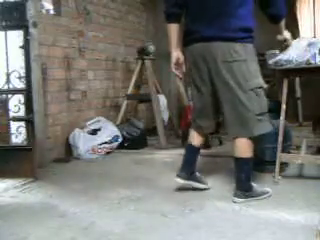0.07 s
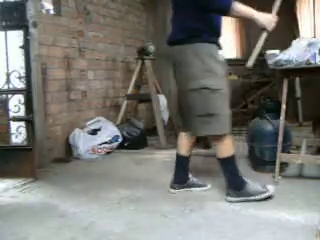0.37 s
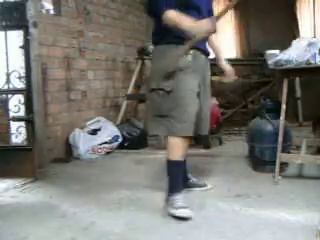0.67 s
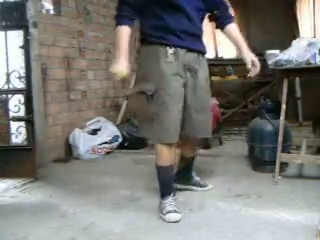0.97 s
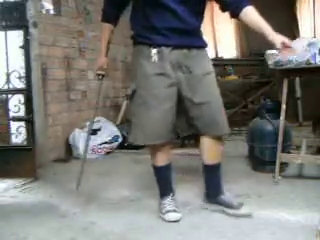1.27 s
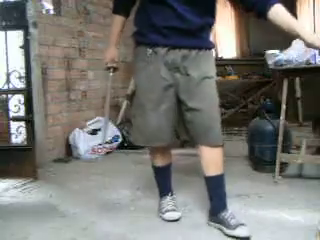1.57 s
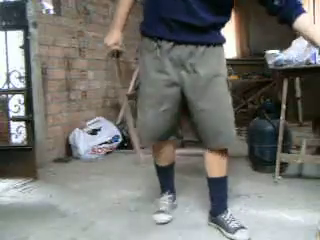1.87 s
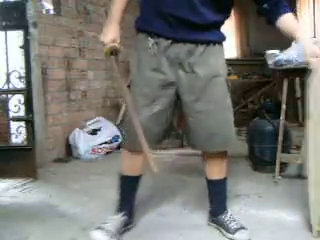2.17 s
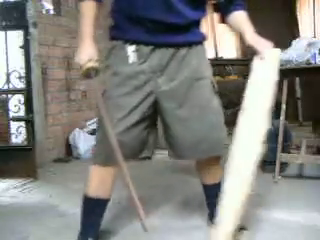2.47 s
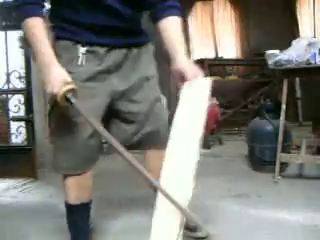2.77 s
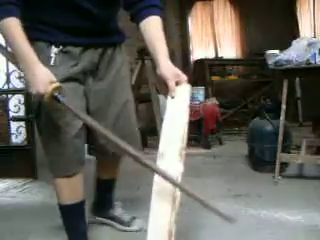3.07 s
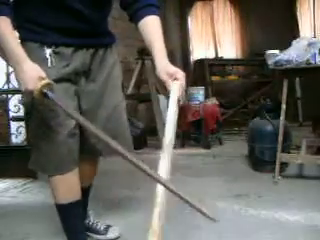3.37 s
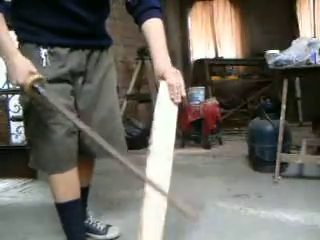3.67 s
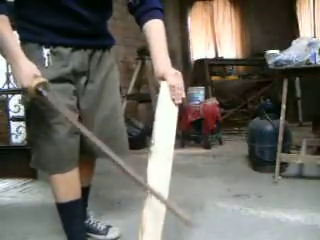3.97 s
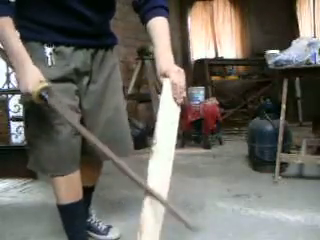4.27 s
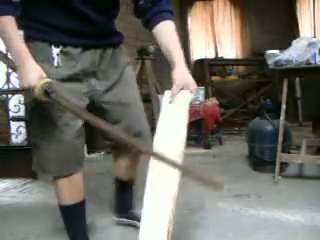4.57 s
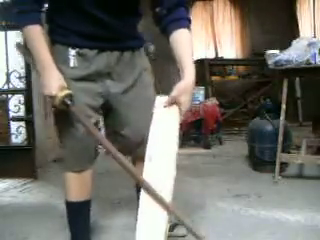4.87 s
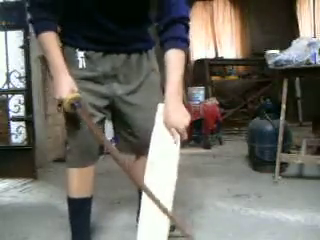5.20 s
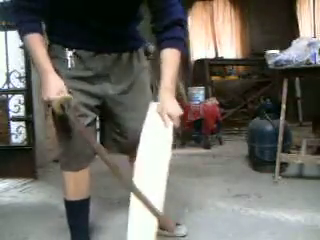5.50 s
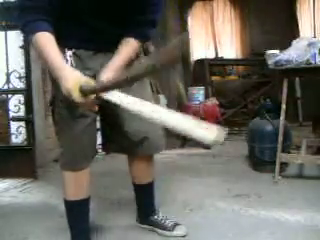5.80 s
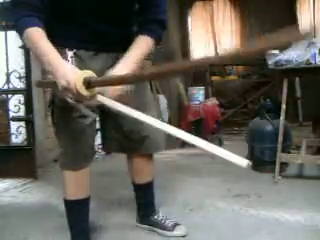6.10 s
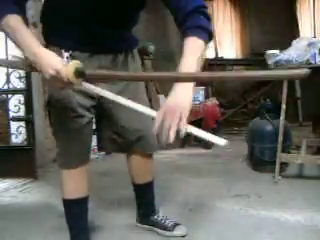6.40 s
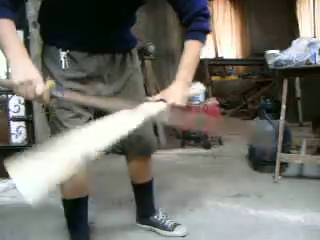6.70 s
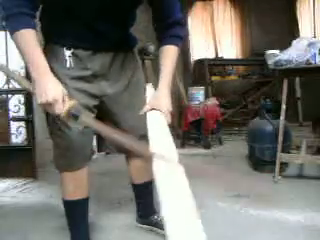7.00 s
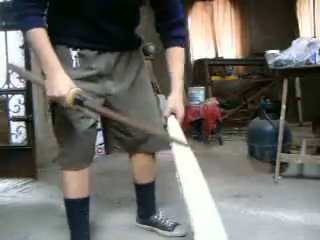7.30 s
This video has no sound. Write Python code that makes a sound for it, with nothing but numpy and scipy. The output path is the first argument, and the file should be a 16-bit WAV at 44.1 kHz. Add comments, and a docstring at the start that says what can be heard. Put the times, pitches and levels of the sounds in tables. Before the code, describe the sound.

In a bare brick workshop, shoes tap and scuff on concrete while clothes and hands rub over a faint hum and low rumble. From about three seconds a wooden sword knocks repeatedly on a hand-held board, each blow cracking, ringing briefly and often rebounding. Two softer knocks and a thin electrical tick follow, then more rubbing and one last blow. The small, close microphone sounds narrow and overloads on hard hits.

```python
"""A bare brick workshop, heard through a small narrow-band microphone near enough to overload.
At first shoes tap and scuff on concrete, and clothes and hands rub, over a faint hum and a low rumble.
From just before 3 s a wooden sword knocks on a hand-held board: both woods crack, ring, often rebound.
Each hard blow overloads the microphone, which turns its gain down after it. Around 6 s come two soft
knocks and a thin electrical tick, then more rubbing, and a last blow just after 7 s."""
import sys
import numpy as np
from scipy import signal
from scipy.fft import rfft, irfft
from scipy.io import wavfile
from scipy.ndimage import uniform_filter1d

SR = 44100
rng = np.random.default_rng(int(sys.argv[2]) if len(sys.argv) > 2 else 0)


def unload_audio(sound):
    """Save the sound as a 16-bit wav file, at the path given as the first command line argument."""
    columns = np.transpose(np.atleast_2d(sound))
    # keep every value between -1 and 1, then stretch to whole-number steps
    steps = np.round(np.clip(columns, -1, 1) * 32767)
    wavfile.write(sys.argv[1], SR, steps.astype(np.int16))


N = 328545

# Steady room tone. Each row: frequency in Hz, relative density in dB.
AIR_COLOUR = [(10, -14), (27, 5), (42, -12), (62, -3), (82, -5), (120, -12.5), (160, -7), (700, -10),
              (1000, -14.5), (1450, -22), (2500, -21), (3800, -29.5), (4300, -38)]
# Mains hum. Each row: frequency in Hz, level in dB.
MAINS_HUM = [(63, -40), (120, -45)]
# Swells of the deep rumble. Each row: time in seconds, relative level in dB.
RUMBLE_SWELLS = [(0.0, -31), (1.76, -29.5), (2.09, -38.5), (2.78, -25), (2.9, -29), (4.6, -44), (4.94, -32),
                 (5.21, -30.5), (5.37, -46.5), (5.64, -53), (5.89, -30), (6.68, -29.5), (7.45, -38)]
# Spectrum of the rumble. Each row: frequency in Hz, relative density in dB.
RUMBLE_COLOUR = [(10, -11.5), (26, 5), (42, -9), (62, 0), (85, -8.5), (118, -9), (160, -14), (300, -32),
                 (1000, -71.5)]
# Colour of the workshop's echo. Each row: frequency in Hz, gain in dB.
ROOM_COLOUR = [(60, -17.5), (250, -6), (600, 1.5), (1200, -1), (2600, 3), (4000, -4.5)]
# Decay of that echo. Each row: frequency in Hz, t60 in seconds.
ROOM_T60 = [(100, 0.93), (300, 0.47), (700, 0.56), (1500, 0.51), (2700, 0.43), (4200, 0.29)]

# Soles dragging. Each row: start in seconds, length in seconds, relative level in dB.
SCUFFS = [(1.69, 0.21, -30), (1.77, 0.24, -28.5), (2.63, .17, -29), (3.37, 0.29, -31.5), (4.43, 0.13, -23),
          (4.54, 0.21, -30.5), (5.07, .07, -21.5), (5.17, 0.15, -32), (6.42, 0.28, -33)]
# Rubber on concrete. Each row: frequency in Hz, relative density in dB.
SCUFF_COLOUR = [(100, -13.5), (300, -4), (600, 2), (850, -3.5), (1400, -16), (3000, -39.5)]
# Strokes along the wood. Each row: start in seconds, length in seconds, relative level in dB.
RUBS = [(0.56, 0.22, -41), (1.04, 0.15, -43), (1.72, 0.19, -33.5), (1.93, 0.15, -29.5), (2.04, 0.27, -35),
        (2.50, 0.18, -35), (2.68, 0.22, -32.5), (3.37, 0.13, -27.5), (5.05, 0.22, -27.5),
        (5.61, 0.2, -28.5), (5.78, 0.16, -29.5), (5.90, 0.21, -25.5), (6.41, 0.11, -25), (6.49, 0.15, -22),
        (6.89, 0.24, -28), (7.01, 0.47, -24.5)]
# The hiss of rubbing. Each row: frequency in Hz, relative density in dB.
RUB_COLOUR = [(300, -10.5), (900, 2), (1600, -7.5), (2200, 1.5), (2700, -3), (3300, -4), (4200, -16)]
# Steps and handling bumps. Each row: start in seconds, force, thud and brightness in dB,
# hollow resonance in Hz, room echo in dB.
TAPS = [(0.002, -24.5, 9, -1.5, 563, -8), (0.112, -16.5, -2, -3, 466, -1.5),
        (0.120, -13, -8.5, -4, 540, -4), (0.373, -25, -14, -4, 950, -0.5), (0.759, -21, -9, 3, 1400, -10),
        (0.767, -16, -15, 7, 2920, -5.5), (1.066, -27, 9, 0.5, 2680, -6.5),
        (2.006, -27.5, -2, 1.5, 2400, -9.5), (2.454, -17.5, 7, -33, 740, -13),
        (2.529, -19.5, 8, -6, 680, -14), (2.691, -31, 5, -1, 640, -8), (4.708, -30, 10, 4, 690, -7),
        (5.072, -26.5, 2, 11.5, 800, -2)]

# The dry crack of wood. Each row: frequency in Hz, relative density in dB.
CRACK_COLOUR = [(30, -20), (100, -6.5), (175, -9.5), (250, -2), (380, -3.5), (650, 1.5), (1050, -2),
                (1400, -8), (2000, -9), (2700, -10.5), (3300, -18), (4200, -30)]
# Modes of the board, struck on its edge and on its flat face.
# Each row: frequency in Hz, relative level in dB, t60 in seconds before the grip scales it.
BOARD_EDGE_MODES = [(291, -12.5, 0.69), (378.8, -3, 0.38), (452, -7, 0.93), (606, 0, 0.29),
                    (751.6, -3.5, 0.39), (847, -0.5, 0.3), (958, -4, 0.31), (1026, 1.5, 0.55),
                    (1105, -4.5, 0.26), (1200, -11.5, 0.12), (1422, -4, 0.59), (1455, -15, 0.13),
                    (1840, -15.5, 0.24), (1940, -8.5, 0.36), (2240, -11, 0.2), (2575, -4, 0.28)]
BOARD_FACE_MODES = [(301.5, 1.5, 0.11), (398, 0.5, 0.14), (494.4, -3, 0.17), (550, -10.5, 0.47),
                    (648, -5.5, 0.074), (717, -3.5, 0.21), (892, -6, 0.46), (1111, -13.5, 0.83),
                    (1360, -22.5, 1)]
# Modes of the oval sword, which bends in two planes, across the blade and along it.
# Each row: frequency in Hz, relative level in dB, t60 in seconds before the grip scales it.
SWORD_ACROSS_MODES = [(660.3, 5, 0.71), (2120, -20, 0.78), (2590, -17, 0.2), (2760, -11, 0.45),
                      (2760, -17, .34), (3200, -20.5, 0.23), (3240, -19, 0.36)]
SWORD_ALONG_MODES = [(685.4, 3, 0.71), (2028, -10.5, 0.47), (2660, -15.5, 0.8), (2707, -17, 0.75),
                     (3220, -24, 0.54)]
# Sword on board. Each row: start in seconds, force, thud and brightness in dB, relative ring of sword,
# board edge and board face in dB, grip looseness as a factor on ring time, share along the blade (0-1).
KNOCKS = [(2.854, -6, 9.5, -5.5, -10.5, 2.5, 5, 0.71, 1), (3.193, -8.5, 10, 0.5, -7.5, 2, 8.5, 0.58, 1),
          (3.569, 3, 1.5, 0.5, -4, -2, 0.5, 0.78, 0.094), (3.909, 2, 5.5, -1, -7, -5.5, 2.5, .98, .4),
          (4.258, -1.5, 2, 1, 2.5, -5, -6.5, 0.85, 0.18), (4.730, -13, -0.5, -5, -1, 1.5, -1.5, 0.55, 1),
          (4.820, 2, 4, -7.5, -6.5, -3, 1, 0.97, 0.57), (5.287, -1, -6.5, 1.5, -3, -9, -0.5, 1.04, 0.97),
          (5.831, -16, 2.5, -13, -6, -8, 13.5, 0.63, 0.52),
          (6.058, -15.5, 0.5, -6.5, 1, -0.5, 11, 0.73, 0.39), (7.129, -5, 12.5, 1, -7, 6.5, 9, 0.76, 0.51)]
# The woods meet again just after a blow, with a similar ring and less thud.
# Each row: start in seconds, force in dB, change of brightness in dB.
REBOUNDS = [(2.882, 3, 1), (3.206, -9, 0.5), (4.324, -10.5, -0.5), (4.875, -7.5, 6), (5.294, -5.5, 9.5),
            (5.357, -12.5, 12.5), (5.425, -17.5, 12.5), (5.845, -15, -3), (6.072, -13, -5.5),
            (6.096, -20, -11.5), (7.154, -.5, -3.5)]

# Colour of the recorder after its overloaded input. Each row: frequency in Hz, gain in dB.
RECORDER_COLOUR = [(3700, 1), (4200, -2.5), (4700, -8), (5600, -5), (7200, -2.5), (10000, -6),
                   (15000, -6.5)]


def amp(db):
    """Decibels to gain."""
    return 10 ** (np.asarray(db) / 20)


def unit_rms(x):
    """Scales to rms 1."""
    return x / np.sqrt(np.mean(x ** 2) + 1e-20)


def curve_at(points, hz):
    """Reads a table on a log-frequency axis."""
    f, value = np.transpose(points)
    return np.interp(np.log(hz + 1), np.log(f + 1), value)


def treble(hz):
    """How much a frequency counts as treble, 0-1."""
    return 1 - 1 / (1 + (hz / 1550) ** 4)


def add(mix, start_s, sound):
    """Mixes a sound in at its start time."""
    part = mix[max(round(start_s * SR), 0):][:len(sound)]
    part += sound[:len(part)]


def noise(colour):
    """Steady noise of a given spectrum, rms 1."""
    hz = np.fft.rfftfreq(N, 1 / SR)
    return unit_rms(irfft(rfft(rng.standard_normal(N)) * amp(curve_at(colour, hz)), N))


def room_tone(air_db=-28):
    """The workshop itself: hiss, a wavering mains hum, and a deep rumble that swells and sinks."""
    t = np.arange(N) / SR
    waver = unit_rms(uniform_filter1d(rng.standard_normal(N), size=14000))
    hum = sum(amp(db) * np.sqrt(2) * np.sin(2 * np.pi * hz * t + 1.2 * waver) for hz, db in MAINS_HUM)
    rumble = amp(1.5 + np.interp(t, *np.transpose(RUMBLE_SWELLS))) * noise(RUMBLE_COLOUR)
    return amp(air_db) * noise(AIR_COLOUR) + hum + rumble


def room_echo(t):
    """Dense echoes from brick and concrete, each band dying at its own speed."""
    hz, when, bands = signal.stft(rng.standard_normal(len(t)), SR, nperseg=512)
    decay_db = 60 * when / curve_at(ROOM_T60, hz)[:, None]
    bands = bands * amp(curve_at(ROOM_COLOUR, hz)[:, None] - decay_db)
    build_up = 1 - np.exp(-t / 0.01)
    return signal.istft(bands, SR, nperseg=512)[1][:len(t)] * build_up


def paths_to_mic(direct_db, chatter_db, chatter_t60, room_db):
    """The direct push arrives first, with a chatter of contacts and near reflections, then the room."""
    t = np.arange(SR) / SR
    chatter = rng.standard_normal(SR) * amp(chatter_db - 60 * t / chatter_t60)
    response = chatter + amp(room_db) * room_echo(t)
    response[0] += amp(direct_db)
    return response


def friction(strokes, colour, grain_db, rise_share=0.14, fall_share=0.62):
    """Surfaces catch and slip; each stroke gathers speed, holds and comes to rest."""
    level = np.zeros(N)
    for start_s, length_s, db in strokes:
        progress = np.arange(0, length_s, 1 / SR) / length_s
        speed = np.clip(np.minimum(progress / rise_share, (1 - progress) / fall_share), 0, 1)
        add(level, start_s, amp(db) * speed)
    catches = unit_rms(uniform_filter1d(rng.standard_normal(N), size=500))
    return uniform_filter1d(level, size=900) * unit_rms(noise(colour) * amp(grain_db * catches))


def sole_scuffs():
    """Rubber soles drag over the concrete floor."""
    return amp(3.0) * friction(SCUFFS, SCUFF_COLOUR, grain_db=1.0)


def wood_rubs(ring_db=17.0, half_width_hz=14):
    """Cloth, palm and sword rub along the wood and set its upper modes singing."""
    hiss = friction(RUBS, RUB_COLOUR, grain_db=1.5)
    hz = np.fft.rfftfreq(N, 1 / SR)
    modes = SWORD_ACROSS_MODES + SWORD_ALONG_MODES + BOARD_EDGE_MODES
    peaks = sum(amp(db) / (1 + ((hz - f) / half_width_hz) ** 2) for f, db, _ in modes if f > 1200)
    return amp(-2.5) * irfft(rfft(hiss) * (1 + amp(ring_db) * peaks), N)


def contact_pulse(thud_db, bright_db, hollow_hz, hollow_db, size=2048):
    """One blow: a heavy contact adds bass, a hard one treble, a hollow body one broad resonance."""
    hz = abs(np.fft.fftfreq(size, 1 / SR))
    crack = amp(curve_at(CRACK_COLOUR, hz))
    bass_db = thud_db / (1 + (hz / 380) ** 4)
    resonance_db = hollow_db / (1 + ((hz - hollow_hz) / (0.15 * hollow_hz)) ** 2)
    gain = crack * amp(bass_db + bright_db * treble(hz) + resonance_db)
    gain /= np.sqrt(np.mean(crack ** 2))
    minimum_phase = np.exp(np.conj(signal.hilbert(np.log(gain))))  # nothing sounds before the contact
    return np.fft.ifft(minimum_phase).real


def taps():
    """Shoes on concrete and light handling bumps: short blows that leave only the room sounding."""
    out = np.zeros(N)
    for start_s, force_db, thud_db, bright_db, hollow_hz, room_db in TAPS:
        paths = paths_to_mic(direct_db=20.5, chatter_db=-0.5, chatter_t60=0.22, room_db=room_db)
        pulse = contact_pulse(thud_db, bright_db, hollow_hz, hollow_db=8.5)
        add(out, start_s, amp(force_db) * signal.fftconvolve(paths, pulse))
    return out


def wood_ring(modes, bright_db, looseness, swell_s):
    """Bending modes of a piece of wood, swelling as the room takes them up."""
    t = np.arange(SR, dtype=np.float32) / SR
    hz, db, t60 = np.transpose(modes)[:, :, None]
    phase, detune, scatter = rng.uniform(-0.96, 1, (3, len(modes), 1))
    hz = hz * (1 + 0.0049 * detune)
    # each mode rings randomly louder or softer on each knock
    strength = amp(db + 8.0 * scatter + bright_db * treble(hz))
    fade = np.exp(np.float32(-np.log(1000) / np.maximum(t60 * looseness, 0.09)) * t)
    waves = fade * np.sin(np.float32(2 * np.pi * hz) * t + np.float32(np.pi * phase))
    return (np.float32(strength) * waves).sum(0) * (1 - np.exp(-t / swell_s))


def sword_ring(along, bright_db, looseness):
    """The roll of the blade shares a blow between its two bending planes."""
    planes = [(SWORD_ACROSS_MODES, 1 - along), (SWORD_ALONG_MODES, along)]
    return sum(np.sqrt(share) * wood_ring(modes, bright_db, looseness, swell_s=0.0034)
               for modes, share in planes)


def knock(force_db, thud_db, bright_db, sword_db, edge_db, face_db, looseness, along):
    """One contact cracks and sets both sword and board ringing."""
    paths = paths_to_mic(direct_db=10.5, chatter_db=2.5, chatter_t60=0.12, room_db=-1.0)
    pulse = contact_pulse(thud_db, bright_db, hollow_hz=795, hollow_db=0.5)
    crack = signal.fftconvolve(paths, pulse)[:SR]
    sword = amp(sword_db - 4.0) * sword_ring(along, bright_db, looseness)
    edge = amp(edge_db - 9.5) * wood_ring(BOARD_EDGE_MODES, bright_db, looseness, swell_s=0.0021)
    face = amp(face_db - 11.0) * wood_ring(BOARD_FACE_MODES, bright_db, looseness, swell_s=0.00049)
    return amp(force_db) * (crack + sword + edge + face)


def sword_on_board(rebound_thud_db=-6.5):
    """The blows and their rebounds, which ring similarly with less bass: the arm's weight is spent."""
    out = np.zeros(N)
    for start_s, *blow in KNOCKS:
        add(out, start_s, knock(*blow))
    for start_s, force_db, brighter_db in REBOUNDS:
        blow_before = [row for row in KNOCKS if row[0] < start_s][-1]
        _, _, thud_db, bright_db, *contact = blow_before
        add(out, start_s, knock(force_db, thud_db + rebound_thud_db, bright_db + brighter_db, *contact))
    return out


def scene():
    """Everything that reaches the microphone, in mono."""
    return (wood_rubs() + sole_scuffs() + sword_on_board() + taps() + room_tone())[None]


def gain_control(x, threshold_db=-15, share=0.68, recover_db_per_s=26, attack_s=0.047, lag_s=0.019):
    """Loud sound pulls the gain down a moment later; it creeps back afterwards."""
    t = np.arange(N) / SR
    power_db = 10 * np.log10(abs(uniform_filter1d(np.clip(x, -1, 1) ** 2, size=900)) + 1e-12)
    cut_db = share * np.maximum(power_db - threshold_db, 0)
    recovery_db = t * recover_db_per_s
    held_db = np.maximum.accumulate(cut_db + recovery_db) - recovery_db
    late_db = np.interp(t - lag_s, t, held_db)
    pole = np.exp(-1 / (attack_s * SR))
    return x * amp(-signal.lfilter([1 - pole], [1, -pole], late_db))


def record(dry, mic_edge_hz=4275, top_hz=16000, ceiling=0.63, bias=0.068):
    """A narrow-band microphone with gain control; hard overload and one tick give the only top end."""
    mic_band = signal.firwin(301, mic_edge_hz, window=("kaiser", 8), fs=SR)
    driven = gain_control(signal.oaconvolve(dry[0], mic_band, "same"))
    # a hard-driven input rectifies a little, so each hard blow shifts the rest point: a low thump
    thump = bias * uniform_filter1d(np.maximum(abs(driven) - ceiling, 0), size=350)
    oversampled = signal.resample_poly(driven + thump, 2, 1)
    clipped = signal.resample_poly(np.clip(oversampled, -ceiling, ceiling), 1, 2)
    add(clipped, start_s=6.021, sound=amp([-12.5]))  # one thin electrical tick
    response = amp(curve_at(RECORDER_COLOUR, np.fft.rfftfreq(2 * N, 1 / SR)))
    coloured = irfft(rfft(clipped, 2 * N) * response)[:N]
    band_limit = signal.firwin(511, top_hz, window=("kaiser", 9), fs=SR)
    return signal.oaconvolve(coloured, band_limit, "same")[None]


dry = scene()
out = record(dry)
unload_audio(out)
```